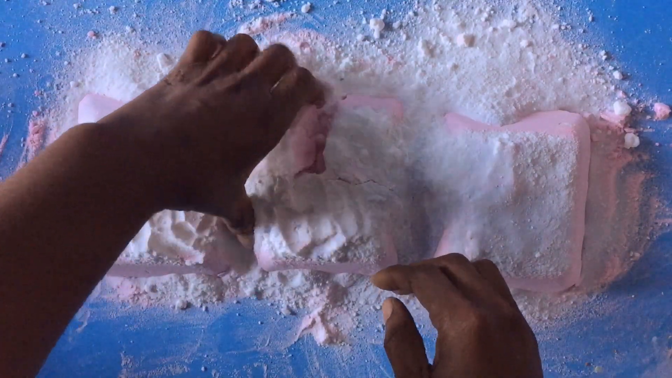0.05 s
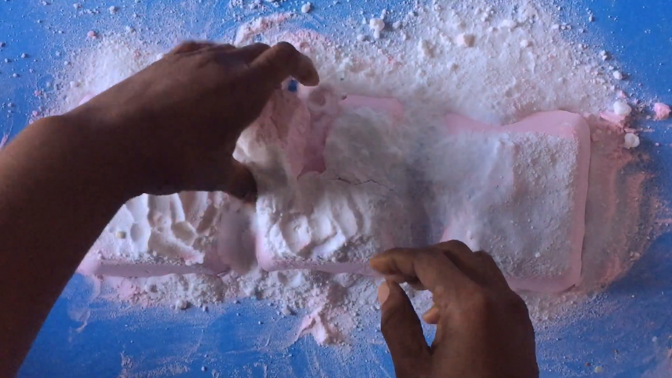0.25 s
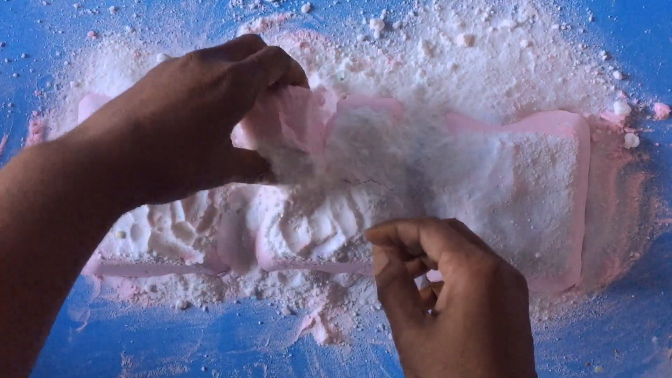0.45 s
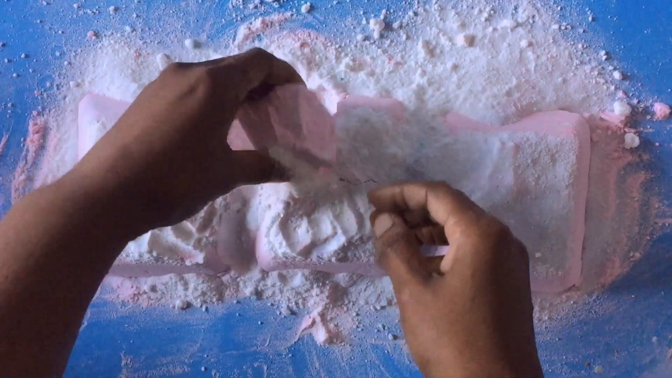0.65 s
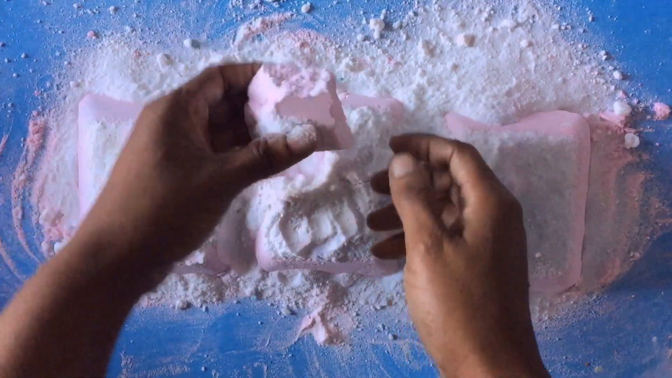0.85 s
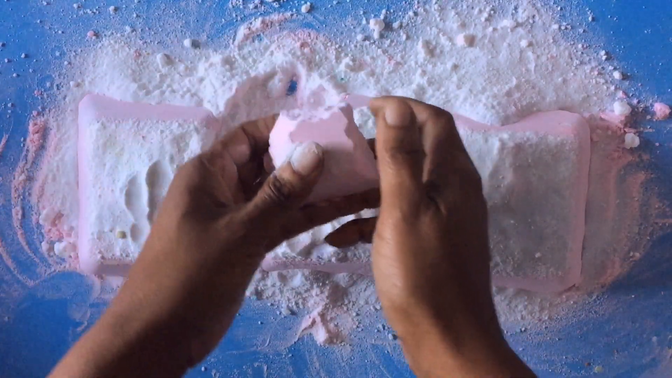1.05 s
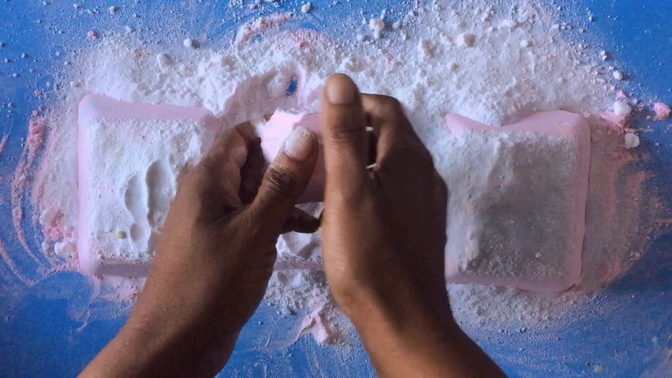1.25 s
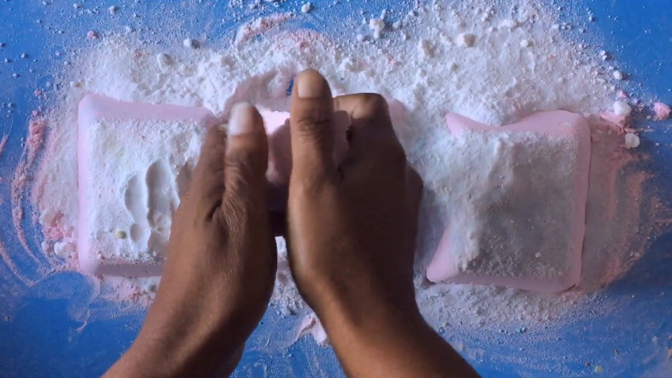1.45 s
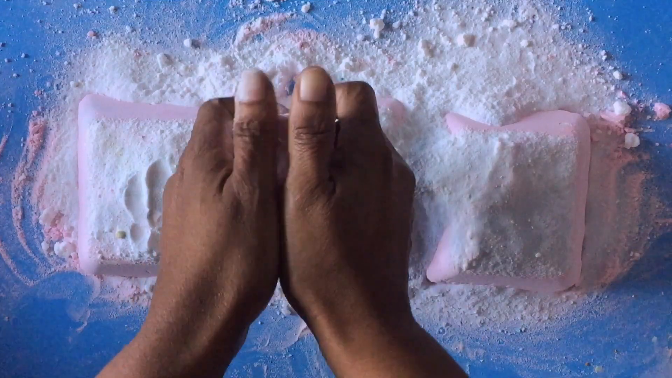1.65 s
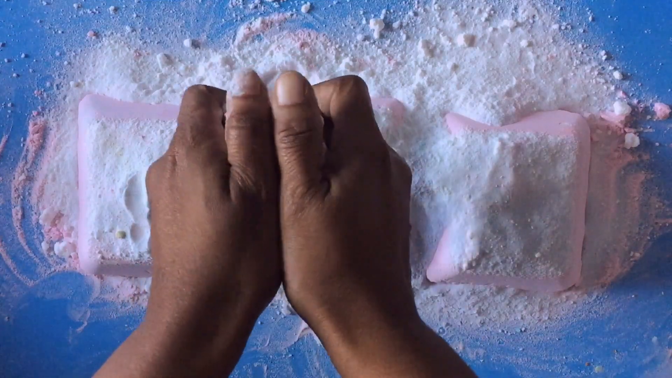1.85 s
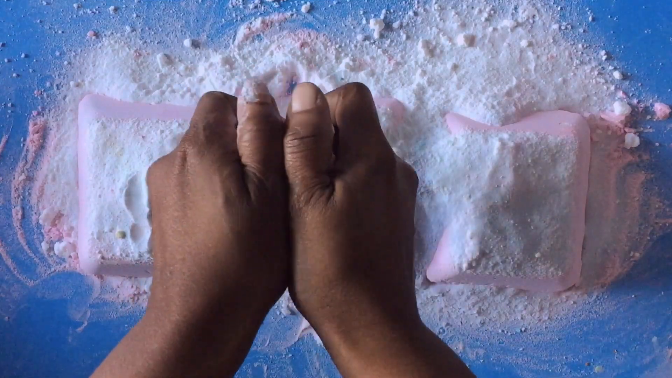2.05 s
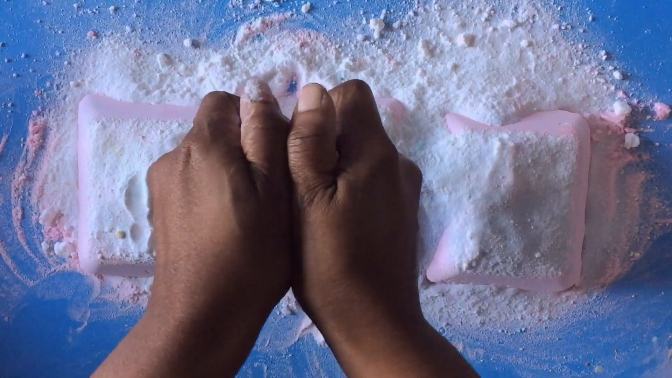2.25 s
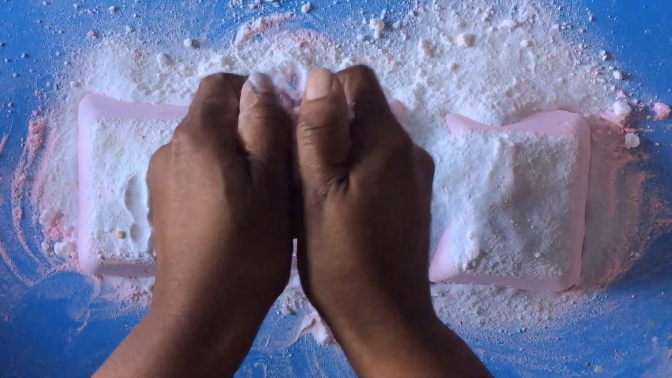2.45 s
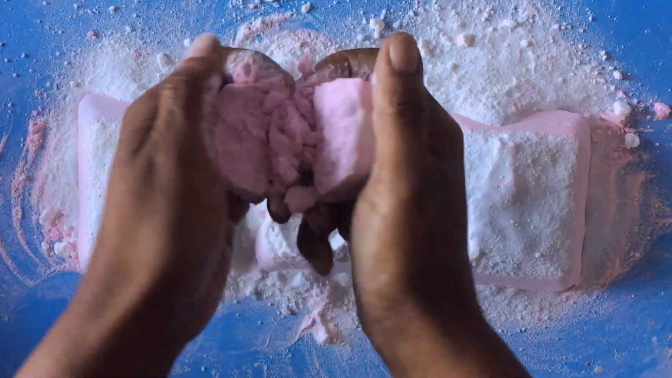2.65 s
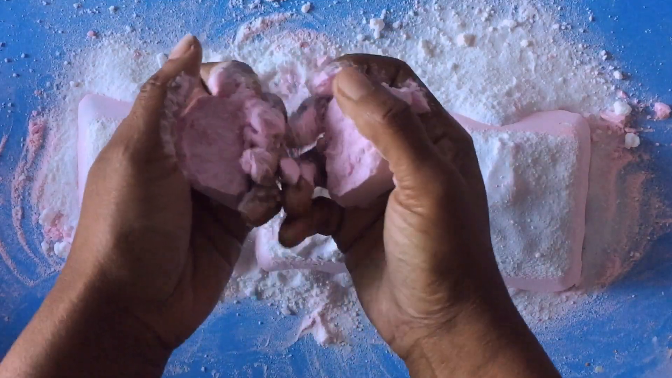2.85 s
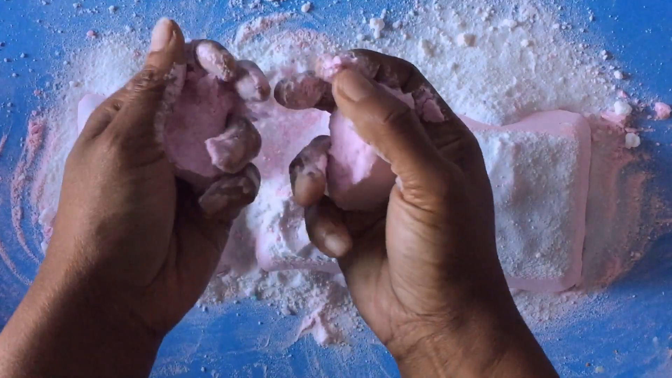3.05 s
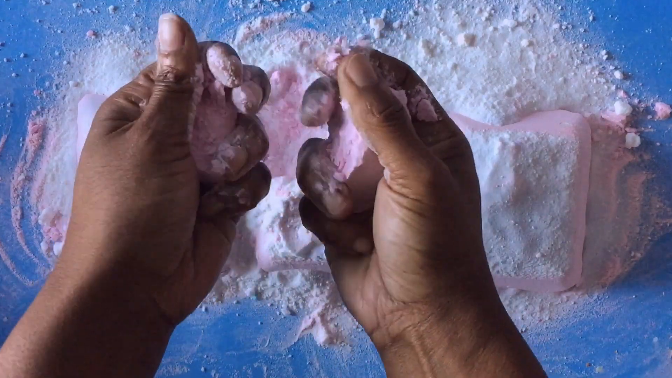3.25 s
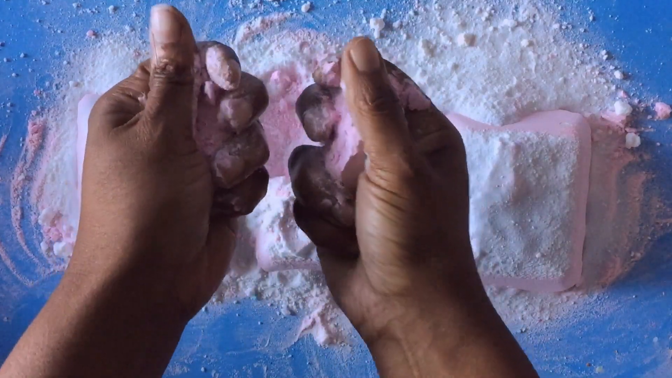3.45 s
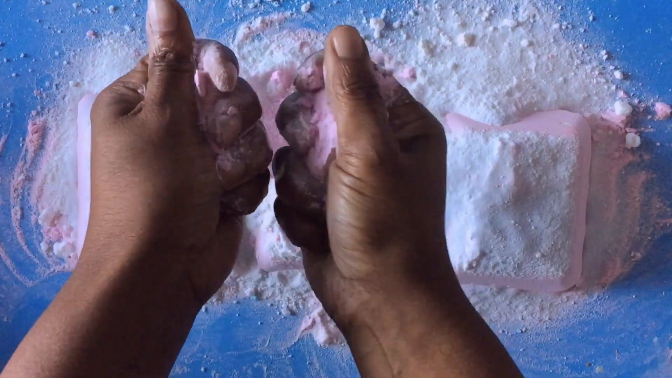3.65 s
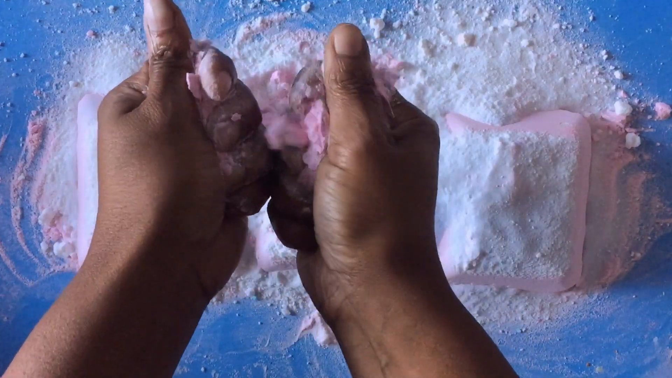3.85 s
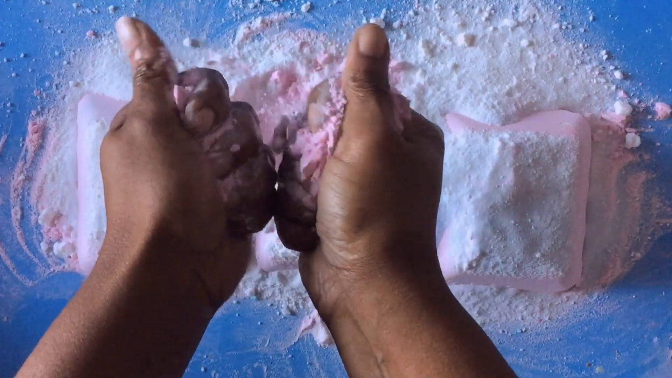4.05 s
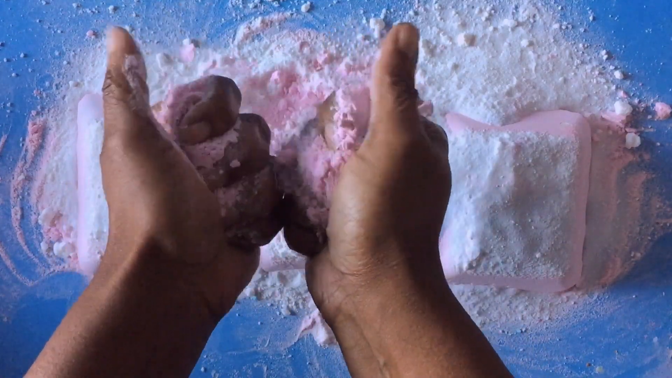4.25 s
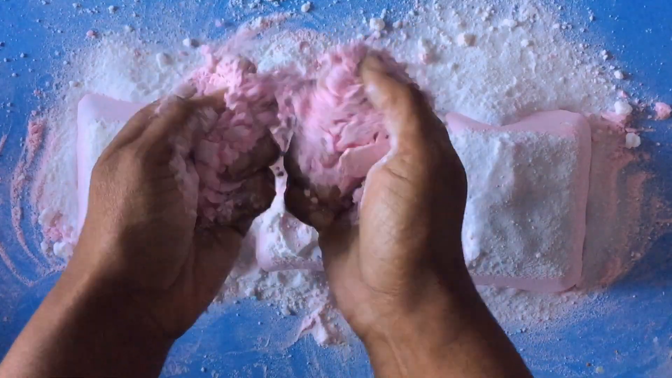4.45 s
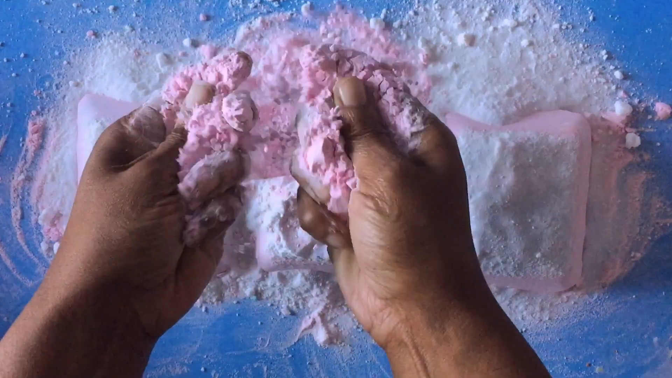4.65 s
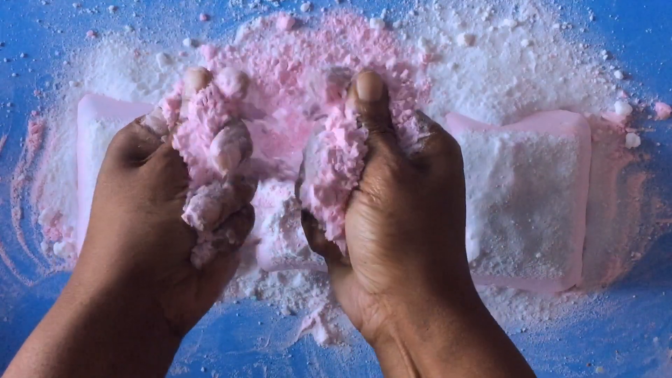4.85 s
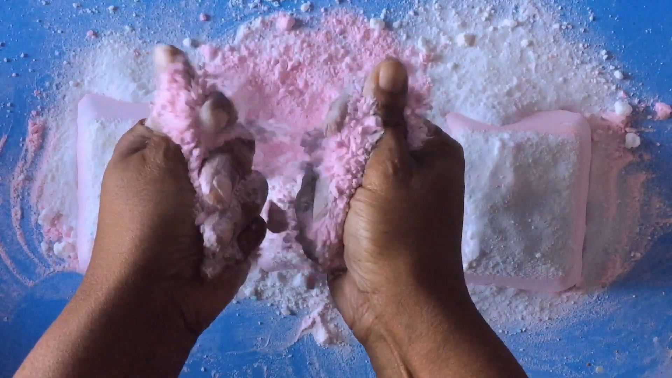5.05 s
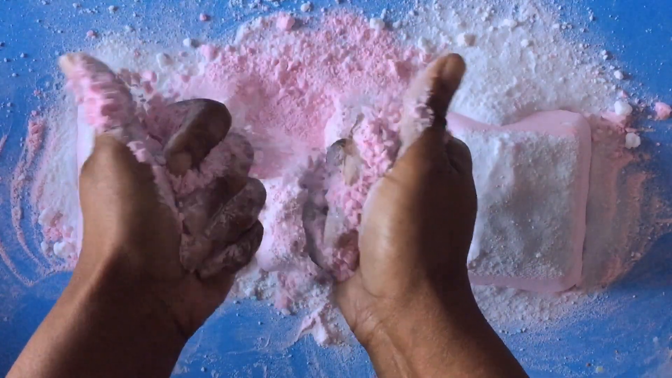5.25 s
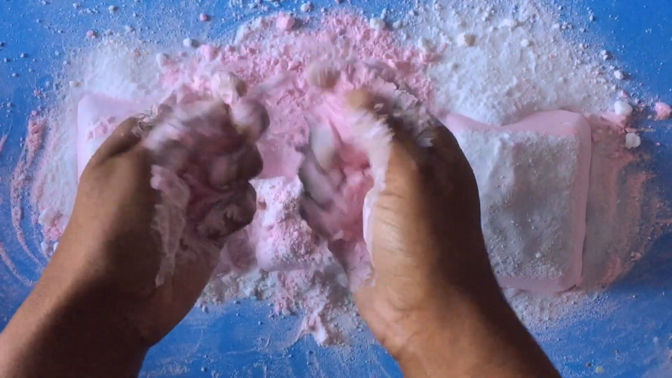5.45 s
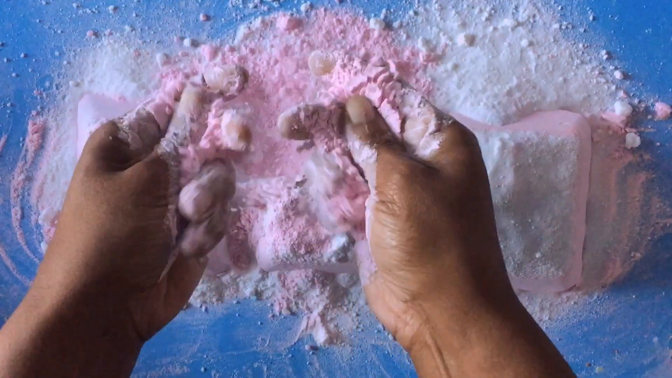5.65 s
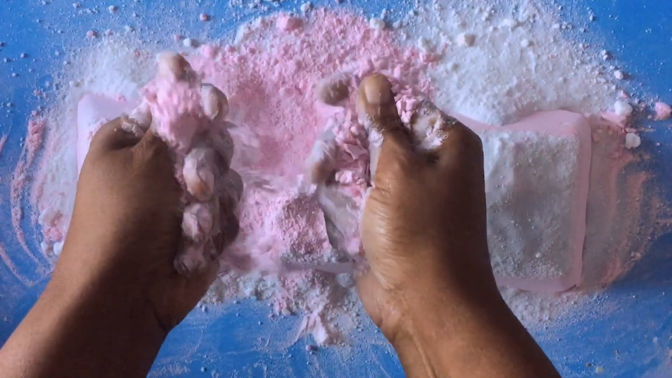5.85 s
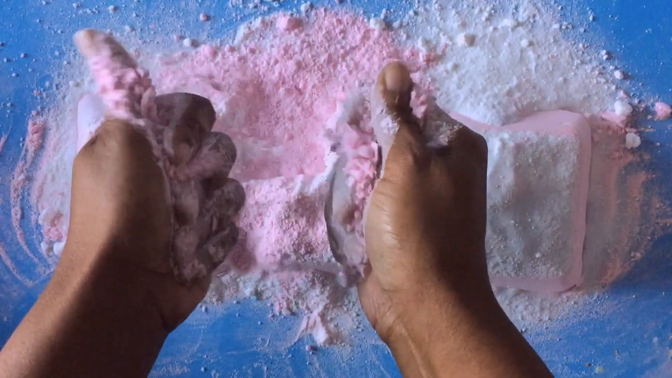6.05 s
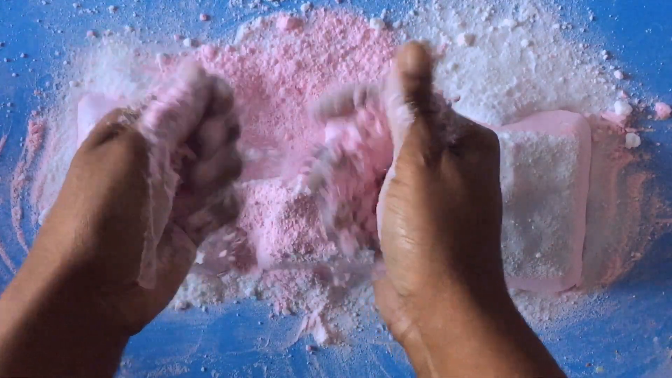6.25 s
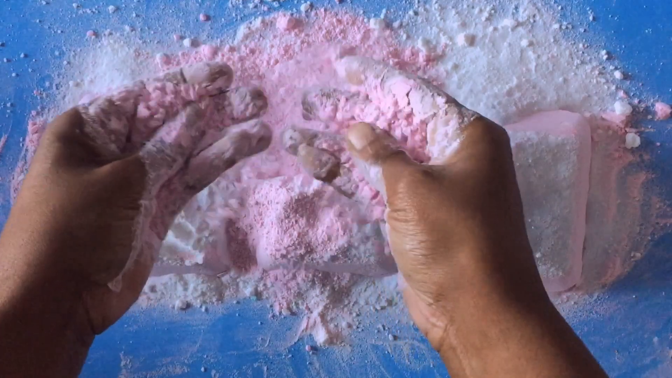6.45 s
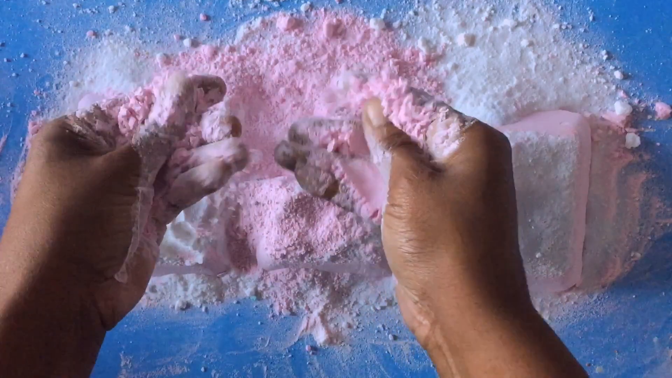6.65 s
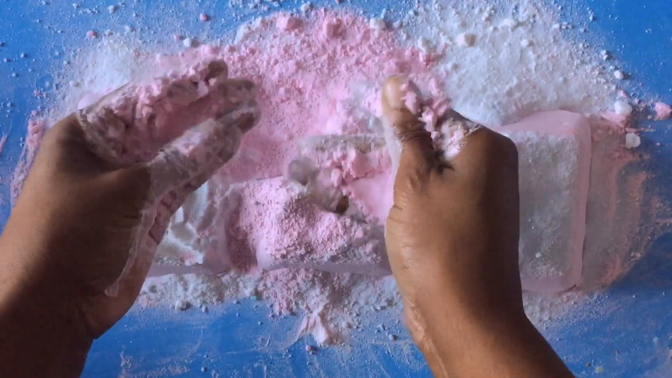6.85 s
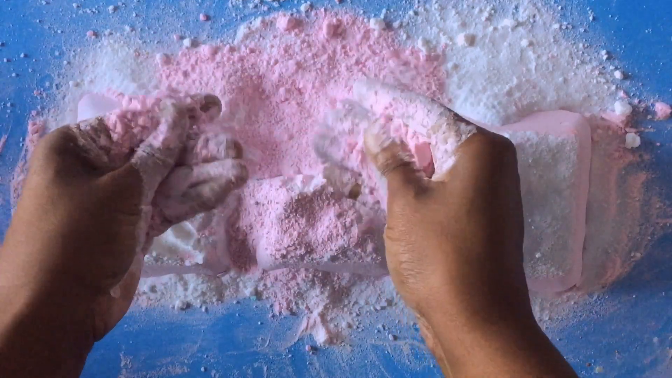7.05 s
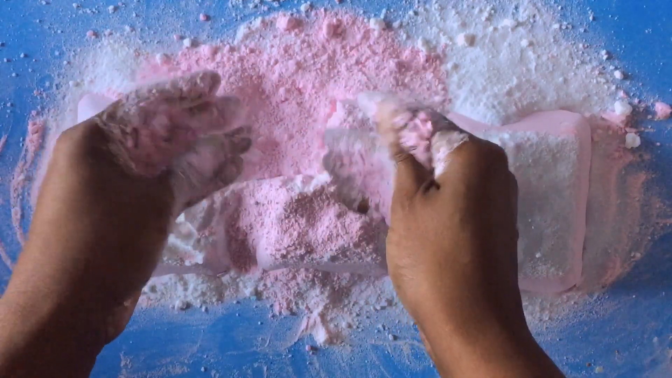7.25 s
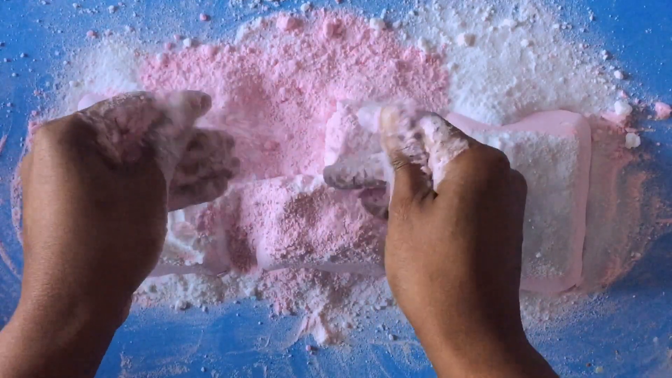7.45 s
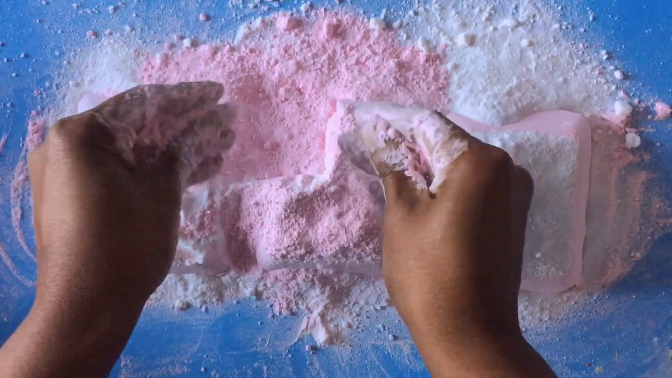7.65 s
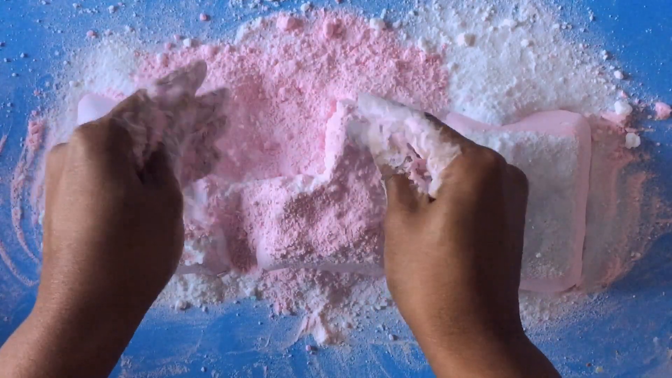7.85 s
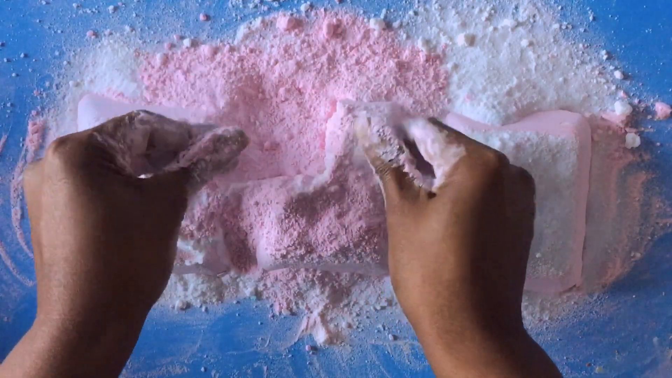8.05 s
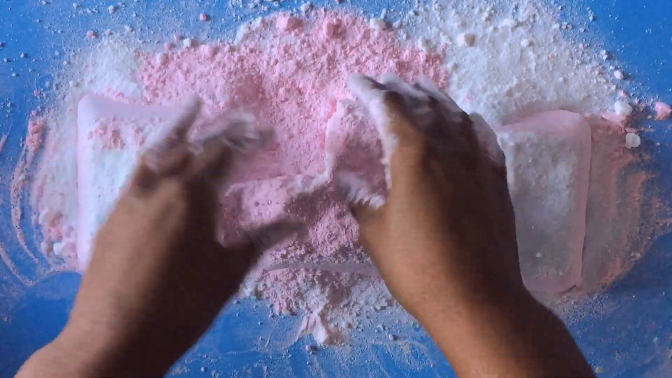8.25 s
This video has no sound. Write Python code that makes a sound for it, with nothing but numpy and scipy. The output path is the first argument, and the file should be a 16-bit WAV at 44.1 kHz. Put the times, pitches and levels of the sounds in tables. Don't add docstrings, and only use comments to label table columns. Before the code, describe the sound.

Close to a small microphone in a quiet room, nails scrape a packed starch block. Sparse small cracks grow into a soft, low knock as it breaks with a rattle of snaps. After a short lull, fists crush the pieces in dense, creaky crunching with sharp snaps, which turns finer and powdery and ends in light dry wipes. Low ventilation rumble and faint hum run underneath.

```python
import sys
import numpy as np
from scipy import signal
from scipy.fft import rfft, irfft, next_fast_len
from scipy.io import wavfile
from scipy.ndimage import uniform_filter1d, map_coordinates

SR = 44100
rng = np.random.default_rng(int(sys.argv[2]) if len(sys.argv) > 2 else 0)


def store_wav(level_fs):
    pcm = np.round(np.clip(np.atleast_2d(level_fs), -1, 1) * 32767)
    wavfile.write(sys.argv[1], SR, pcm.T.astype(np.int16))


def voltage_ratio(level):
    return 10 ** (np.asarray(level, float) / 20)


N = 366030

# (frequency [Hz], width [Hz], level [dB])
PALM_MODES = [(131, 124, -2), (229.6, 37.5, 4.5), (318, 37, 3), (434, 167, 1.5)]
# (frequency [Hz], width [Hz], level [dB])
LUMP_MODES = [(570, 330, 1.5), (738, 93, 2), (1010, 155, 4.5), (1510, 230, -2.5)]
# (peak [s], build-up [s], release [s], pressure [dB], dryness [dB])
FIST_PRESSES = [(3.328, 0.18, 0.21, -65, 0.5), (3.6, .3, 0.31, -55, 1), (3.92, .3, 0.19, -51, -3),
                (4.2, .4, 0.25, -46, -2.5), (4.451, .15, .15, -57.5, -15), (4.711, 0.033, .15, -58, -8),
                (4.8, .2, 0.29, -47.5, -8.5), (5.02, .25, 0.22, -45.5, -8), (5.22, .2, 0.26, -49.5, -12.5),
                (5.68, .1, 0.31, -56, -7.5), (5.93, .35, .38, -51, -8), (6.53, .15, 0.38, -54, -7),
                (6.79, .2, 0.13, -63.5, -3), (7.0, 0.091, 0.14, -68, 2), (7.125, 0.12, 0.13, -62, -16),
                (7.301, 0.033, 0.098, -70, -6.5)]
# (time [s], half length [s], hiss [dB], airy top over it [dB])
RUB_STROKES = [(3.49, 0.3, -64.5, -11), (3.833, 0.61, -62, -5), (4.063, .3, -61.5, -10),
               (4.47, 0.24, -62.5, -1), (4.632, .04, -65, -16), (4.718, 0.076, -55, -13),
               (4.778, 0.081, -58.5, -4), (5.074, 0.39, -60, -6.5), (5.235, 0.27, -60, -1),
               (5.457, 0.19, -61.5, -1.5), (5.619, 0.049, -63, -13), (5.749, 0.18, -60, -22),
               (5.943, 0.17, -55.5, -6), (6.12, 0.16, -60.5, 0.5), (6.225, 0.19, -64.5, -0.5),
               (6.575, 0.16, -73, -11), (6.71, 0.37, -59.5, -11), (6.85, 0.11, -64.5, -1),
               (7.042, 0.31, -65, -3.5), (3.29, 0.34, -65.5, -10), (6.378, 0.14, -76.5, 8)]
# (peak [s], build-up [s], release [s], hiss [dB], airy top over it [dB])
THUMB_WIPES = [
    (7.179, 0.15, 0.14, -56, -1),
    (7.293, 0.079, 0.052, -58.5, -5.5),
    (7.423, 0.047, 0.083, -59.5, -3),
    (7.535, 0.15, 0.1, -58, -0.5),
    (7.627, 0.037, 0.16, -56.5, -2),
    (7.777, 0.11, 0.088, -55, 2.5),
    (7.9, 0.051, 0.052, -58.5, 3.5),
    (8.012, 0.18, 0.31, -60, 4.5),
    (8.18, 0.1, 0.037, -62.5, 2.5),
]
# (time [s], peak [dB], ring [Hz])
TEAR_CRACKS = [(2.357, -41, 1900), (2.369, -45, 1920), (2.375, -39, 3030), (2.382, -35, 1700),
               (2.3927, -41, 2940), (2.4063, -37, 1400), (2.4158, -38, 2500), (2.4248, -38, 1460),
               (2.3956, -36, 3000), (2.44, -33, 1700), (2.4635, -36, 1360), (2.485, -45, 1500),
               (2.504, -49, 1500), (2.529, -50, 1600)]
PRESS_SHAPE = 1.9


def unit(x):
    return x / np.sqrt(np.mean(x ** 2) + 1e-20)


def along(points, hz):
    f, v = np.transpose(points)
    return np.interp(np.log(hz + 1), np.log(f + 1), v)


def wobble(rate):
    knots = rng.standard_normal(int(N * rate / SR) + 4)
    return map_coordinates(knots, [np.arange(N) * rate / SR])


def filtered(x, response):
    m = next_fast_len(len(x) + 8192)
    return irfft(rfft(x, m) * response(np.fft.rfftfreq(m, 1 / SR)), m)[:len(x)]


def coloured(spectrum):
    return unit(filtered(rng.standard_normal(N), lambda hz: voltage_ratio(along(spectrum, hz))))


def fading(x, t60):
    return signal.lfilter([1], [1, -voltage_ratio(-60 / (t60 * SR))], x)


def steady(x):
    return x / np.sqrt(np.abs(uniform_filter1d(x * x, SR // 9)) + 1e-12)


def resonant(modes):
    return lambda f: sum((-1) ** k * voltage_ratio(db) * 1j * f * w / (c * c - f * f + 1j * f * w)
                         for k, (c, w, db) in enumerate(modes))


def struck(x, modes, soft_hz):
    f = np.fft.rfftfreq(8192, 1 / SR)
    power = sum(np.abs(resonant([mode])(f)) ** 2 for mode in modes)
    power = power / (1 + (f / soft_hz) ** 4)
    cepstrum = irfft(np.log(power + 1e-12) / 2)
    cepstrum[1:4096] *= 2
    cepstrum[4097:] = 0
    impulse_response = irfft(np.exp(rfft(cepstrum)))[:4096]
    return signal.fftconvolve(x, impulse_response)[:len(x)]


def swells(rows, rest_db, shape):
    edge_db = 19
    t = np.arange(0, N + SR // 500, SR // 500) / SR
    s, rise, fall, db = np.transpose(rows)[:, :, None]
    away = np.abs(t - s) / np.abs(np.where(t < s, rise, fall))
    power = voltage_ratio(2 * rest_db) + voltage_ratio(2 * (db - edge_db * away ** shape)).sum(0)
    return np.interp(np.arange(N) / SR, t, 10 * np.log10(power))


def room_tone():
    # (frequency [Hz], level per Hz [dB])
    rumble_spectrum = [(15, 0.5), (30, -1.5), (40, -8), (50, 4), (60, -10), (75, -12.5), (100, -52)]
    # (frequency [Hz], level per Hz [dB])
    air_spectrum = [(50, -22), (80, 1), (125, 2), (170, -10), (240, -9.5), (300, -15.5), (500, -24.5),
                    (700, -27), (2000, -29), (4400, -32), (8000, -44.5), (12000, -48), (16000, -78)]
    # (frequency [Hz], rms level [dB])
    motor_lines = [(118.4, -74.5), (242.2, -67.5), (360.7, -80.5)]
    # (peak [s], build-up [s], release [s], level [dB])
    duct_surges = [
        (.5, .5, 0.15, -47),
        (1.3, 0.81, 0.19, -58),
        (2.6, 0.83, 0.49, -51.5),
        (3.13, 0.13, 0.31, -46.5),
        (5.95, 0.51, 0.35, -46),
        (6.72, 0.25, 0.18, -47),
    ]
    t = np.arange(N) / SR
    drift = np.cumsum(wobble(19)) / SR

    def line_level_db():
        return 1.6 * wobble(13) - 0.3 * t

    hum = sum(voltage_ratio(db + 3.5 + line_level_db()) * np.sin(2 * np.pi * hz * (t + 0.0101 * drift))
              for hz, db in motor_lines)
    rumble_db = swells(duct_surges, -48.5, PRESS_SHAPE) - 0.5
    return voltage_ratio(rumble_db) * coloured(rumble_spectrum) + voltage_ratio(-60) * coloured(air_spectrum) + hum


def walls(x):
    # (frequency [Hz], t60 [s])
    wall_decay = [(200, 0.31), (2000, 0.37), (10000, 0.063)]
    hz, t, z = signal.stft(rng.standard_normal(SR // 2), SR, nperseg=256)
    decay = voltage_ratio(-60 * t / along(wall_decay, hz)[:, None])
    tail = signal.istft(z * decay, SR, nperseg=256)[1]
    delayed = np.pad(x, (200, 0))
    return signal.fftconvolve(delayed, tail / np.linalg.norm(tail))[:N]


def squeak():
    # (time [s], length [s], slips per second [Hz], peak [dB])
    skin_creak = (7.108, .034, 255, -47.5)
    s, length, rate, db = skin_creak
    at = np.arange(0, length, 1 / rate)
    slips = np.zeros(N)
    slips[np.round((s + at) * SR).astype(int)] = np.sin(np.pi * (at + 0.0044) / (length + 0.0067))
    creak = struck(slips, [(rate, 120, 0), (700, 500, -8)], soft_hz=1200)
    return voltage_ratio(db) * creak / np.abs(creak).max()


def block_break():
    # (time [s], peak [dB])
    break_event = [
        (2.333, -20),
    ]
    # (frequency [Hz], level [dB], t60 [s])
    block_modes = [(139, -5.5, 0.045), (218.5, -3.5, 0.052), (332, 3, 0.021), (493, -8.5, 0.024)]
    out = np.zeros(N)
    t = np.arange(SR // 4) / SR
    soft_onset = 1 - np.exp(-(t / 0.0029) ** 2)
    for s, db in break_event:
        ring = sum(voltage_ratio(level - 60 * t / t60) * np.cos(2 * np.pi * hz * (t - 0.0043))
                   for hz, level, t60 in block_modes)
        out[round(s * SR) - 66:][:len(t)] += voltage_ratio(db + 1.5) * ring * soft_onset
    return out


def snaps(events, under, t60, tick_hz, front):
    # (share of pitch [1], share of width [1], level [dB])
    shard_modes = [(.66, 0.7, -3), (1, 0.21, 3), (1.45, 0.3, -7), (2.1, 0.35, -9.5)]
    out = np.zeros(N + SR)
    t = np.arange(SR // 20) / SR
    spray_envelope = voltage_ratio(-60 * t / t60) * (1 - np.exp(-(t / 0.001) ** 2))

    def to_peak(x):
        return x / np.abs(x).max()

    for s, db, hz, thud_db, tick_db in events:
        spray = rng.standard_normal((3, len(t))) * spray_envelope
        spray[:, :52] *= 0.33
        spray[:, 52] = front * np.array([1, 0.45, 1])
        modes = [(hz * share, hz * width + 100, level) for share, width, level in shard_modes]
        ring = struck(spray[0], modes, soft_hz=2.4 * hz)
        tick = struck(spray[1], [(tick_hz, 0.76 * tick_hz, 0)], soft_hz=0.5 * tick_hz)
        thud = struck(np.abs(spray[2]), under, soft_hz=under[-1][0] * 2.7)
        crack = to_peak(ring) + voltage_ratio(tick_db + 1.0) * to_peak(tick) + voltage_ratio(thud_db - 5.5) * to_peak(thud)
        out[round(s * SR):][:len(t)] += voltage_ratio(db) * crack
    return out[:N]


def cracks():
    # (time [s], peak [dB], ring [Hz], tick over the ring [dB])
    lump_snaps = [(2.332, -33, 2300, -9.5), (2.9914, -36.5, 4030, -26), (3.001, -34.5, 6660, -13),
                  (3.4744, -43, 2420, 0), (4.396, -33, 5860, -3.5), (4.443, -36, 4000, -0.5),
                  (4.47, -44, 5300, -20), (4.517, -42, 5800, -30), (4.537, -46, 6240, -17),
                  (4.6135, -44, 4000, -10), (4.619, -38.5, 5700, -23), (4.624, -35, 2750, -19),
                  (4.6396, -29.5, 5900, -34), (4.6596, -45, 5020, -19), (4.688, -22.5, 3150, -27),
                  (4.6884, -28.5, 1710, -30), (4.6977, -31, 3200, -15), (4.7093, -32, 3360, -26),
                  (4.736, -37, 3130, -20), (4.774, -42, 3000, -16), (4.804, -41, 5800, -20),
                  (5.215, -38, 2000, -19), (5.598, -51, 8010, -17), (5.6114, -35, 3330, -26.5),
                  (6.4682, -54.5, 3740, -2), (6.484, -40, 2200, 3), (6.974, -47.5, 4055, 3.5),
                  (7.309, -44, 2880, -4)]
    # (time [s], peak [dB], ring [Hz], thud over the ring [dB])
    fist_slips = [(3.272, -42, 1670, -6), (3.302, -53, 1010, -12), (3.411, -40.5, 2360, -18),
                  (3.575, -33, 956, 2), (3.608, -40, 2231, -14), (3.665, -46.5, 2410, 16),
                  (3.692, -25.5, 1220, -1), (3.748, -37.5, 2030, 4), (3.772, -28, 930, -23),
                  (3.8, -30.5, 1690, -14), (3.82, -30, 1010, 11), (3.883, -36, 984, -17),
                  (3.931, -31.5, 1010, -2), (3.941, -35, 1910, -10), (4.06, -36.5, 932, 10.5),
                  (4.136, -29.5, 1141, 1), (4.213, -27.5, 949, 3), (4.247, -26.5, 2190, -4),
                  (4.307, -31.5, 2220, 1), (4.472, -26.5, 1240, -24), (4.563, -39, 976, -18),
                  (4.853, -33, 1590, -3), (5.034, -31, 1100, -23), (5.168, -29.5, 691, 1),
                  (5.216, -41, 503, 14), (5.881, -32.5, 989, -16.5), (5.967, -36.5, 500, 6),
                  (6.54, -32.5, 1000, 1), (6.579, -36, 1074, -6), (7.011, -49, 1980, 0)]
    # (time [s], peak [dB], ring [Hz])
    prising_cracks = [
        (0.6395, -46, 7050),
        (0.6765, -43.5, 5940),
        (0.6965, -48, 3370),
        (0.72, -42.5, 3370),
        (0.743, -48.5, 3400),
        (0.7605, -53, 6000),
    ]
    # (time [s], peak [dB], ring [Hz])
    split_cracks = [
        (1.8033, -49, 5900),
        (1.956, -48, 2850),
        (2.0665, -30.5, 2220),
        (2.1518, -44, 2960),
        (2.1605, -30.5, 2300),
        (2.1738, -40, 2960),
        (2.189, -44, 2990),
        (2.219, -29.5, 2320),
        (2.284, -46, 3030),
        (2.3224, -53, 2040),
    ]
    # (time [s], peak [dB])
    palm_creaks = [(1.9484, -50), (1.9674, -50), (1.975, -50), (1.9844, -51), (1.9974, -51), (2.007, -51),
                   (2.0214, -50), (2.035, -53), (2.0494, -52), (2.059, -51), (2.1044, -49), (2.1206, -49),
                   (2.1274, -51), (2.141, -46), (2.1963, -43), (2.2314, -46), (2.2674, -47), (2.2744, -46)]
    in_open = [(*row, -35, -3) for row in prising_cracks]
    in_open += [(*row, -22, -36) for row in split_cracks]
    in_open += [(*row, -19, -32) for row in TEAR_CRACKS]
    in_open += [(s, db, hz, -16, tick_db) for s, db, hz, tick_db in lump_snaps]
    in_open += [(*row, 2600, -22, -36) for row in palm_creaks]
    muffled = [(*row, -14.5) for row in fist_slips]
    return (snaps(in_open, LUMP_MODES, t60=0.014, tick_hz=8000, front=2.4)
            + snaps(muffled, PALM_MODES, t60=0.008, tick_hz=4870, front=3.5))


def rub():
    # (frequency [Hz], level per Hz [dB])
    powder_spectrum = [(1500, -9), (2600, -2), (3600, -0.5), (5000, 1), (6800, -3), (9500, -9.5),
                       (15800, -23)]
    # (frequency [Hz], level per Hz [dB])
    dust_spectrum = [(4000, -17), (7000, 0.5), (9500, -2), (12500, -2), (14500, -9), (15800, -8.5)]
    # (time [s], half length [s], hiss [dB], airy top over it [dB])
    block_touches = [(0.712, 0.08, -76, 1), (1.137, 0.075, -67, -8), (1.32, 0.14, -69, -14),
                     (1.42, 0.065, -68, -2), (1.5, .04, -69.5, -2), (1.584, 0.06, -67.5, -5),
                     (1.89, 0.18, -64.5, -17), (2.08, .08, -64, -16), (2.183, .12, -73, -17),
                     (2.373, 0.068, -61, -15), (2.48, 0.62, -70, -16), (2.997, 0.35, -66.5, -12)]
    # (peak [s], build-up [s], release [s], hiss [dB], airy top over it [dB])
    nail_scrapes = [
        (.045, 0.031, 0.035, -59, -15),
        (.1, 0.028, 0.05, -48, -16),
        (0.144, 0.043, 0.024, -47, -8),
        (.19, .04, 0.14, -67.5, -12),
        (.43, 0.16, 0.032, -64, -17),
        (.565, .065, 0.043, -62, -12),
    ]
    # (peak [s], build-up [s], release [s], hiss [dB], airy top over it [dB])
    grain_sprays = [
        (4.1, .004, .05, -58, -1),
        (4.643, .004, 0.025, -68, -16),
        (4.693, .004, 0.036, -55, -9),
        (3.5, .004, 0.028, -63, -1),
    ]
    stroke_shape, wipe_shape = 1.17, 1.26
    rest_hiss_db, rest_top_db = -84, -82

    def spill(gain_db):
        return [(s, a, r, db + dryness + gain_db) for s, a, r, db, dryness in FIST_PRESSES]

    strokes = block_touches + RUB_STROKES
    hiss = [(s, half, half, db) for s, half, db, _ in strokes] + spill(-13.5)
    airy_top = [(s, half, half, db + airy) for s, half, db, airy in strokes] + spill(-30)
    hiss_db = swells(hiss, rest_hiss_db, stroke_shape)
    top_db = swells(airy_top, rest_top_db, stroke_shape)
    wipes = THUMB_WIPES + nail_scrapes + grain_sprays
    wipe_db = swells([row[:4] for row in wipes], rest_top_db, wipe_shape)
    wipe_top_db = swells([(s, a, r, db + airy) for s, a, r, db, airy in wipes], rest_top_db, wipe_shape)
    grain = unit(voltage_ratio(1.5 * wobble(220) + 1.33 * wobble(50) + 1.3 * wobble(12)))
    powder = np.hypot(voltage_ratio(hiss_db), voltage_ratio(wipe_db)) * coloured(powder_spectrum)
    dust = np.hypot(voltage_ratio(top_db + 0.5), voltage_ratio(wipe_top_db - 1.0)) * coloured(dust_spectrum)
    return grain * (powder + dust)


def pressure():
    # (peak [s], build-up [s], release [s], pressure [dB], dryness [dB])
    flat_presses = [
        (.11, 0.16, 0.13, -66, 3),
        (.4, 0.22, 0.054, -72, 4.5),
        (.71, 0.49, 0.091, -77.5, 4.5),
        (1.97, 0.24, 0.27, -92, 13),
        (2.08, 0.1, 0.15, -84, 14.5),
        (2.16, 0.067, .05, -69, -7),
        (2.22, 0.17, .15, -67.5, 3),
        (2.42, .14, 0.071, -53, -3),
        (2.55, 0.1, 0.11, -74, 4),
        (3.01, 0.032, 0.049, -65, -17),
    ]
    stroke_crust_db = -10.5
    thud = [(s, a, r, db - 3) for s, a, r, db, _ in flat_presses]
    thud += [(s, a, r * 0.99, db - 0.24 * dryness + 1) for s, a, r, db, dryness in FIST_PRESSES]
    presses = flat_presses + FIST_PRESSES
    crunch = [row[:4] for row in presses]
    crust = [(s, a, r, db + dryness) for s, a, r, db, dryness in presses]
    crust += [(s, 2.0 * half, 0.78 * half, db + stroke_crust_db) for s, half, db, _ in RUB_STROKES]
    crust += [(s, a, r, db + stroke_crust_db) for s, a, r, db, _ in THUMB_WIPES]
    return swells(thud, -72.5, PRESS_SHAPE), swells(crunch, -82, PRESS_SHAPE), swells(crust, -102, PRESS_SHAPE)


def slip_impulses(crunch_db):
    # (time [s], slip rate share [1], grip share [1])
    wear = [
        (4.3, 0.77, 0.42),
        (5.0, 1, 0.25),
        (6.4, 1.2, 0.34),
        (7.0, 1.13, 0.27),
    ]
    # (time [s], level over the usual slip [dB])
    closing_slips = [(3.3336, 7.0), (3.3389, 1.0), (3.3511, 6.0), (3.3645, 3.0), (3.3766, 3.0),
                     (3.3826, 4.0), (3.39, 2.0), (3.4246, 4.0), (3.431, 5.0), (3.4374, 6.0), (3.4449, 5.0),
                     (3.4584, 7.0), (3.4877, 2.0), (3.4936, 8.0), (3.5043, 6.0), (3.5154, 6.0),
                     (3.5324, 5.0), (3.5404, 6.0), (3.5474, 3.0), (3.558, 4.0), (3.5645, 4.0),
                     (3.5915, 1.0), (3.6028, 1.0), (3.6161, 3.0), (3.6239, 3.0), (3.6376, 2.0),
                     (3.6424, 3.0), (3.6697, 3.0), (3.6776, 1.0), (3.7057, 2.0), (3.737, 2.0),
                     (3.7612, 7.0), (3.7886, 2.0), (3.8165, 3.0), (3.829, 6.0), (3.8368, 2.0),
                     (3.8557, 4.0), (3.8643, 3.0), (3.8936, 6.0), (3.9019, 7.0), (3.9064, 6.0),
                     (3.9197, 2.0)]
    # (time [s], level over the usual slip [dB])
    hardest_slips = [(3.964, 8.0), (3.9731, 5.0), (3.988, 2.0), (3.9987, 4.0), (4.0123, 6.0), (4.0193, 3.0),
                     (4.0298, 2.0), (4.0349, 4.0), (4.041, 7.0), (4.0478, 5.0), (4.0715, 5.0),
                     (4.0771, 7.0), (4.0841, 3.0), (4.0901, 4.0), (4.0987, 2.0), (4.1039, 3.0),
                     (4.1138, 2.0), (4.1195, 4.0), (4.1258, 7.0), (4.147, 3.0), (4.1564, 8.0),
                     (4.1694, 3.0), (4.174, 5.0), (4.1814, 4.0), (4.1943, 4.0), (4.2083, 5.0),
                     (4.2252, 4.0), (4.2347, 7.0), (4.2429, 1.0), (4.2567, 4.0), (4.2663, 2.0),
                     (4.2763, 5.0), (4.2882, 4.0), (4.2927, 3.0), (4.3156, 0.0), (4.3272, 7.0),
                     (4.3389, 3.0), (4.3445, 1.0)]
    # (time [s], level over the usual slip [dB])
    second_slips = [(4.758, 2.0), (4.7643, 3.0), (4.769, 3.0), (4.779, 5.0), (4.7909, 2.0), (4.8104, 4.0),
                    (4.8208, 6.0), (4.8299, 6.0), (4.8402, 5.0), (4.8591, 5.0), (4.8754, 6.0),
                    (4.8899, 6.0), (4.9031, 6.0), (4.915, 4.0), (4.9285, 6.0), (4.9439, 4.0), (4.9566, 6.0),
                    (4.9677, 4.0), (4.9778, 7.0), (4.9849, 6.0), (4.9975, 9.0), (5.01, 7.0), (5.0228, 4.0),
                    (5.0481, 5.0), (5.0648, 4.0), (5.0739, 3.0), (5.0827, 6.0), (5.0919, 4.0),
                    (5.1047, 9.0), (5.1266, 4.0), (5.1426, 5.0), (5.1624, 2.0), (5.1743, 3.0),
                    (5.1899, 5.0), (5.1983, 3.0), (5.2063, 7.0), (5.2111, 3.0), (5.2305, 4.0),
                    (5.2353, 4.0), (5.2444, 6.0), (5.2529, 6.0), (5.2583, 4.0), (5.2643, 2.0),
                    (5.2726, 4.0), (5.2824, 6.0), (5.3025, 4.0), (5.3087, 6.0), (5.3249, 5.0),
                    (5.3544, 7.0), (5.3603, 9.0), (5.3692, 3.0), (5.3748, 3.0), (5.3836, 4.0),
                    (5.3922, 5.0), (5.4002, 8.0), (5.4076, 2.0), (5.4193, 4.0), (5.4241, 3.0)]
    # (time [s], level over the usual slip [dB])
    third_slips = [(5.6533, 5.0), (5.6614, 3.0), (5.6675, 4.0), (5.6721, 7.0), (5.6788, 7.0), (5.7013, 3.0),
                   (5.7256, 9.0), (5.742, 6.0), (5.7578, 4.0), (5.7673, 7.0), (5.79, 6.0), (5.8089, 4.0),
                   (5.828, 6.0), (5.8545, 8.0), (5.8609, 4.0), (5.8688, 8.0), (5.8751, 3.0), (5.8943, 4.0),
                   (5.9321, 6.0), (5.9408, 6.0), (5.9458, 6.0), (5.9572, 4.0), (5.9683, 9.0), (5.9819, 3.0),
                   (5.9936, 5.0), (6.0174, 4.0), (6.0354, 5.0), (6.0413, 6.0), (6.0509, 3.0), (6.0591, 6.0),
                   (6.0678, 3.0), (6.0763, 6.0), (6.0841, 5.0), (6.0978, 8.0), (6.1098, 4.0), (6.1198, 5.0),
                   (6.1286, 5.0), (6.1403, 7.0), (6.1559, 6.0), (6.1637, 3.0), (6.2071, 3.0), (6.2123, 3.0),
                   (6.2282, 4.0), (6.2364, 5.0), (6.2472, 7.0)]
    # (time [s], level over the usual slip [dB])
    fourth_slips = [(6.451, 2.0), (6.461, 7.0), (6.4748, 7.0), (6.4903, 6.0), (6.504, 9.0), (6.518, 7.0),
                    (6.5285, 5.0), (6.5335, 3.0), (6.5507, 5.0), (6.5594, 4.0), (6.5652, 4.0),
                    (6.5985, 5.0), (6.6068, 2.0), (6.62, 4.0), (6.6257, 7.0), (6.6418, 8.0), (6.657, 7.0),
                    (6.6697, 5.0), (6.6756, 5.0), (6.6823, 4.0), (6.6871, 4.0), (6.6963, 5.0),
                    (6.7016, 6.0), (6.7194, 3.0), (6.7415, 6.0), (6.7574, 4.0), (6.7653, 6.0),
                    (6.7764, 10.0), (6.7848, 7.0), (6.7964, 5.0), (6.8073, 4.0), (6.8156, 4.0),
                    (6.828, 8.0), (6.8432, 5.0), (6.8484, 5.0), (6.8604, 3.0)]
    # (small slips [dB], crust in distinct slips [dB])
    squeeze_balance = [
        (-10, 0),
        (-10, 0),
        (-11, 1),
        (-5, -4),
        (-2, -5),
        (-11, -1),
    ]
    rate = np.interp(crunch_db, [-60, -47], [95, 235])
    grip = np.interp(crunch_db, [-72, -63], [0.1, 1])
    s, rate_share, grip_share = np.transpose(wear)
    t = np.arange(N) / SR
    quicker, softer = np.interp(t, s, rate_share), np.interp(t, s, grip_share)
    progress = np.cumsum(rate * quicker * voltage_ratio(2.2 * wobble(90))) / SR
    at = np.flatnonzero(np.diff(np.floor(progress)))
    drawn = rng.standard_normal((N // 60, 5))
    chance = drawn[:len(at)]
    slips = np.zeros((3, N))
    strength_db = 2.2 * chance[:, 0] + [[3], [2.5], [3]] * chance[:, 1:4].T
    slips[:, at] = np.sign(chance[:, 4] + 0.9) * voltage_ratio(strength_db)
    slips *= grip * softer

    squeezes = [TEAR_CRACKS, closing_slips, hardest_slips, second_slips, third_slips, fourth_slips]
    sharp, loose = np.ones((2, N))
    for rows, (small_db, crust_edge_db) in zip(squeezes, squeeze_balance):
        span = slice(round(rows[0][0] * SR), round(rows[-1][0] * SR) + 1)
        slips[:, span] *= voltage_ratio(small_db)
        sharp[span], loose[span] = voltage_ratio(crust_edge_db), voltage_ratio(small_db / 2)

    distinct = [(s, 7) for s, *_ in TEAR_CRACKS]
    distinct += closing_slips + hardest_slips + second_slips + third_slips + fourth_slips
    when, db = np.transpose(distinct)
    at = np.round(when * SR).astype(int)
    chance = drawn[-len(at):]
    strength_db = np.minimum(db, 9) - 3.5 - np.array([[1], [0], [1.5]])
    strength_db = strength_db + [[1.2], [0.4], [0.8]] * chance[:, 1:4].T
    slips[:, at] = np.sign(chance[:, 4] + 1.5) * np.sqrt(softer[at]) * voltage_ratio(strength_db)
    slips[2, at] *= sharp[at]
    return slips, loose


def crush():
    # (frequency [Hz], width [Hz], level [dB])
    crust_modes = [(1810, 930, 1), (2100, 280, 2.5), (3030, 130, -1.5)]
    thud_db, crunch_db, crust_db = pressure()
    slips, loose = slip_impulses(crunch_db)
    grit = rng.standard_normal((3, N))
    thud = struck(slips[0] + 0.025 * grit[0], PALM_MODES, soft_hz=800)
    lump_grains = (0.17 * fading(slips[1], 0.011) + 0.025 * loose) * grit[1]
    crunch = struck(slips[1] + lump_grains, LUMP_MODES, soft_hz=1700)
    crust_grains = (0.3 * fading(slips[2], 0.011) + 0.04 * loose) * grit[2]
    crust = struck(slips[2] + crust_grains, crust_modes, soft_hz=4000)
    spark_grains = 0.72 * fading(slips[2], 0.0093) * grit[0]
    spark = struck(slips[2] + spark_grains, [(5060, 3900, 0)], soft_hz=9000)
    return (voltage_ratio(crust_db - 14) * steady(spark) + voltage_ratio(thud_db) * steady(thud)
            + voltage_ratio(crunch_db) * steady(crunch) + voltage_ratio(crust_db) * steady(crust))


def scene():
    hands = crush() + rub() + cracks() + block_break() + squeak()
    return (hands + voltage_ratio(-14.0) * walls(hands) + room_tone())[None]


def low_pass(x):
    return signal.sosfilt(signal.butter(12, 16450, fs=SR, output="sos"), x)


def record(dry):
    mix = filtered(dry[0], lambda hz: hz < 15850)[None]
    return low_pass(mix)


dry = scene()
out = record(dry)
store_wav(out)
```